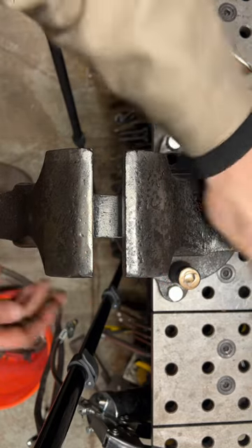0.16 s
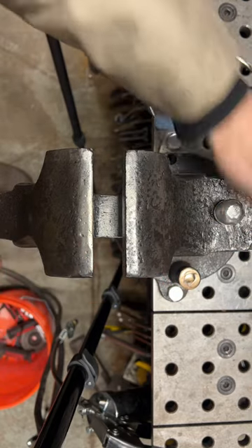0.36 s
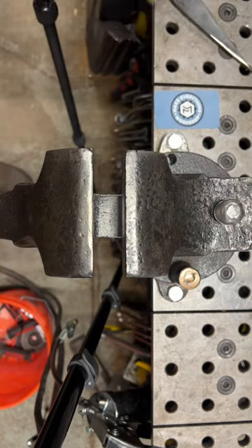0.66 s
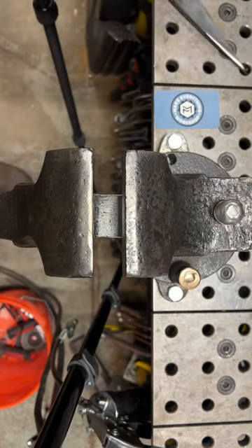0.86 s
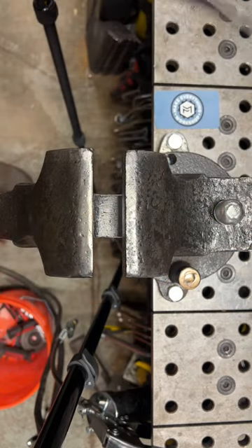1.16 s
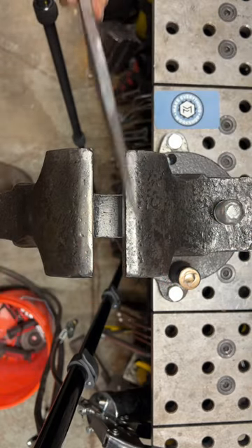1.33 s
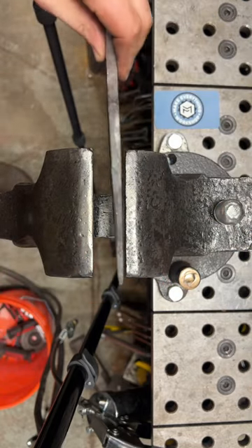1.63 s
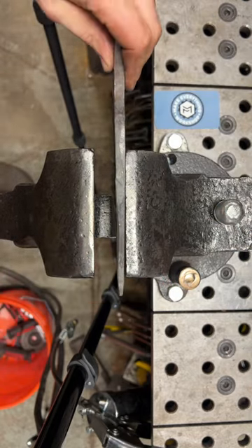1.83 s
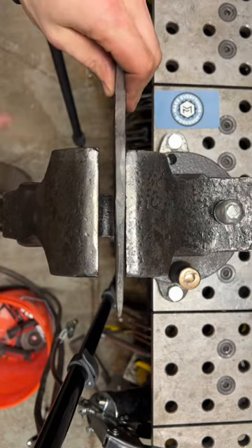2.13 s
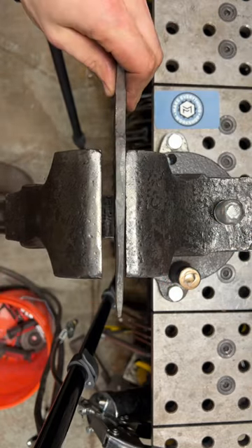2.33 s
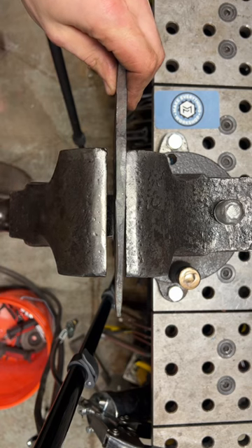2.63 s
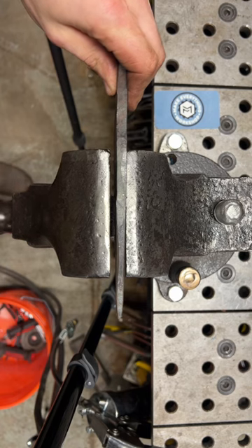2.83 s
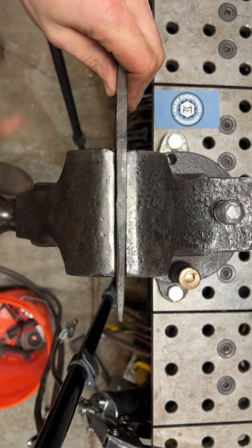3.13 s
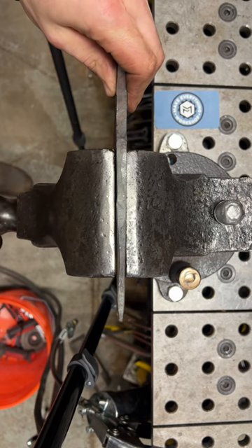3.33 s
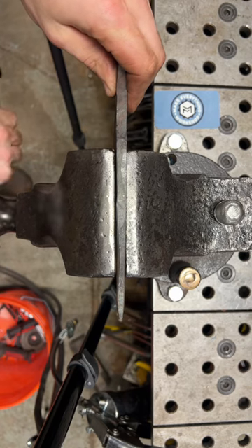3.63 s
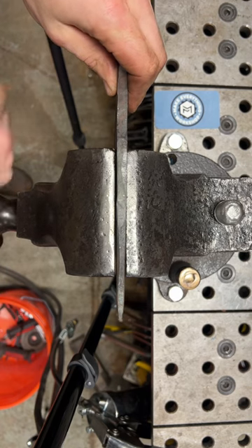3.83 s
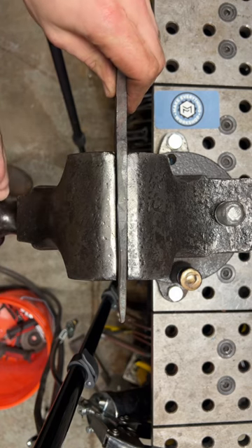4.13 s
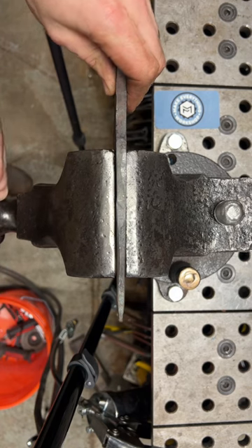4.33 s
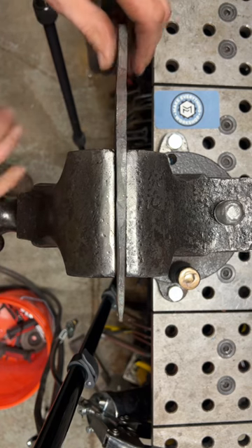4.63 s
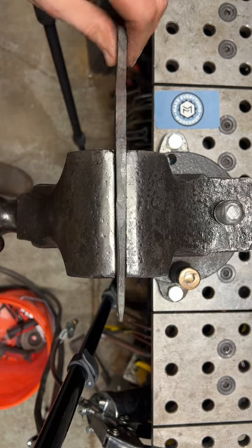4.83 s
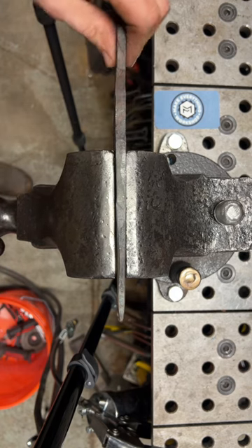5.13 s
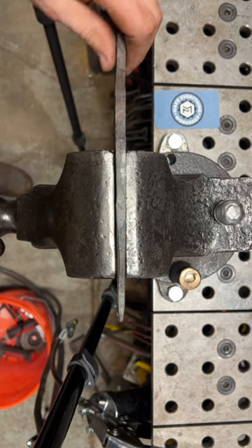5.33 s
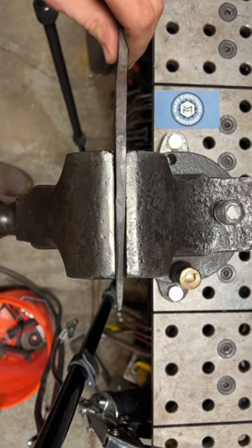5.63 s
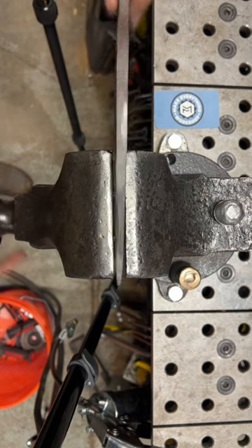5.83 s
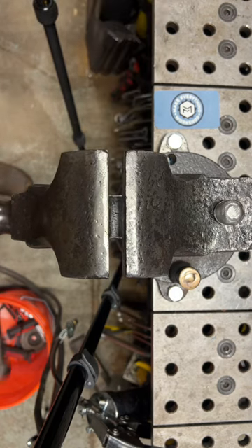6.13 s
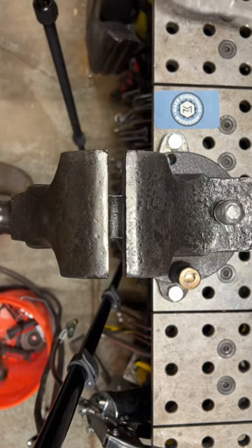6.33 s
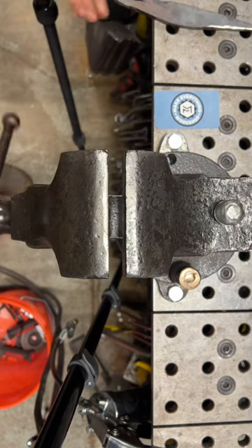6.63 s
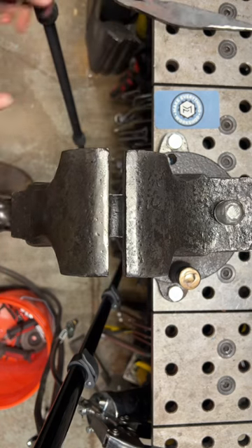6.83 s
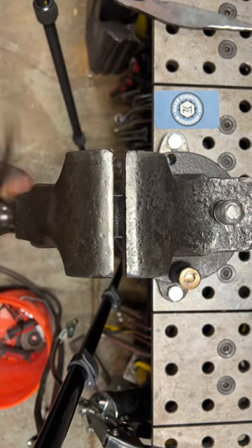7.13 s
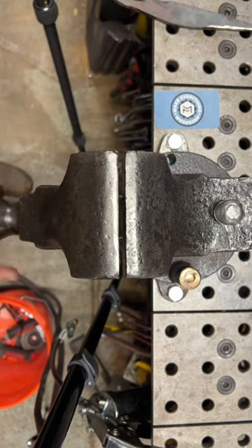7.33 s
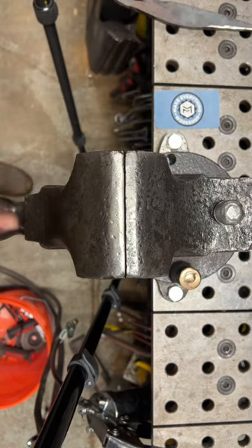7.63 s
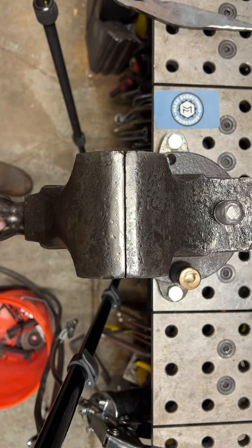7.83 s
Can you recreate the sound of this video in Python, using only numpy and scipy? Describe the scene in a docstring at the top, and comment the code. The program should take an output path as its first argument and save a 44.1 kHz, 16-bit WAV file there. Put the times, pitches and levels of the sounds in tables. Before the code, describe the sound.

A close stereo pickup in a workshop with short, faint echoes, over low stand rumble and quiet, swelling hiss. Tiny knocks at 0.1 s, then a soft gritty scrape of steel on the table around 0.8-0.9 s. A bright, thin tick rings at 1.56 s. Light clicks from 1.9 to 2.9 s lead to a strong dull clunk with a crack at 3.1 s. Uneven smaller knocks and rattles follow, with low jolts near 3.9 and 4.3 s, then a sharp triple clank around 4.45 s. A near-quiet gap ends with a thumping clunk at 5.42 s and the loud ringing clank at 5.5 s. High clinks at 6.2-6.3 s precede the blade's loud, bright clatter at 6.36-6.43 s, sliding out until 6.7 s. From 6.9 s quick hollow clacks gather, with a hard clink at 7.55 s, fading into small ticks by 7.9 s.

```python
"""A cast-iron bench vise is worked on a steel blade: slack in the screw knocks the casting into ringing modes.
The loose handle bar clinks, each time a bright crack and a ring; small loose parts rattle on the casting.
The blade is slid over the steel table in dense ticks and dropped, ringing its own modes; jolts thump the stand.
The stand rumbles under the work, as low noise that follows hands and knocks; quiet hiss swells and sinks.
The near metal has workshop echoes and is heard through two microphone ports."""
import sys
import numpy as np
from scipy import signal
from scipy.fft import rfft, irfft, next_fast_len
from scipy.io import wavfile
from scipy.ndimage import uniform_filter1d

SR = 44100
rng = np.random.default_rng(int(sys.argv[2]) if len(sys.argv) > 2 else 0)


def dump_mix(stems):
    """Bounce the given channels to the path in sys.argv[1] as a 16-bit WAV at rate SR."""
    frames = np.atleast_2d(stems).T  # one column per channel
    limited = np.clip(frames, -1, 1)  # hard clip at full scale
    pcm = np.round(limited * 32767).astype(np.int16)
    wavfile.write(sys.argv[1], SR, pcm)


N = 351036  # length in samples

# dull knocks in the casting: start_s, peak_db, centre_hz (of the blow), ring_factor (limited in use)
KNOCKS = [(0.112, -46.5, 660, .86), (0.148, -42.5, 1090, 1.24), (.817, -41, 840, 9.9),
          (1.714, -40.5, 630, 0.7), (1.92, -27.5, 585, 0.87), (2.096, -45.5, 636, 1.1),
          (2.137, -32.5, 653, 0.75), (2.234, -36, 593, 1.5), (2.277, -30.5, 922, 1),
          (2.592, -38.5, 840, .58), (2.782, -31, 815, 2.5), (2.83, -25, 662, 0.74), (2.858, -17, 910, 0.55),
          (3.087, -28.5, 880, 2.3), (3.114, -6.5, 866, 1.95), (3.15, -19, 814, 2.1), (3.34, -31, 1170, 1.6),
          (3.367, -26, 1380, 0.45), (3.402, -36, 690, 1.2), (3.491, -36, 1350, 1.6),
          (3.602, -39.5, 600, 1.2), (3.633, -20.5, 1007, .8), (3.721, -32.5, 987, 0.87),
          (3.759, -33.5, 531, 0.52), (3.862, -21.5, 954, .57), (3.931, -25.5, 1054, 1.3),
          (4.298, -38.5, 400, 3.0), (4.316, -21.5, 895, 1.2), (4.44, -18, 1090, 3.5),
          (4.463, -14.5, 1014, 1.1), (4.485, -14.5, 1920, 1), (4.896, -40, 1000, 1.3),
          (4.995, -36, 1010, 1.9), (5.422, -21.5, 388, 2.5), (5.428, -11.5, 830, 1.1),
          (5.449, -18.5, 1400, 0.53), (5.503, -3, 1026, 1.23), (5.614, -13, 1300, 0.52),
          (5.883, -40, 590, 1.7), (5.961, -26.5, 1400, 0.44), (6.281, -26.5, 2275, 1.0),
          (6.309, -25, 2320, 0.67), (6.456, -28.5, 612, 0.3), (6.532, -32.5, 597, 1.1),
          (6.72, -29.5, 1042, 0.87), (6.743, -32, 1010, .41), (6.786, -41.5, 1490, 0.44),
          (6.863, -36.5, 590, .64), (6.933, -16.5, 777, 1), (6.974, -12, 1095, 0.79),
          (7.036, -40, 890, .96), (7.053, -26, 810, 2.4), (7.089, -29.5, 1500, .8), (7.131, -18, 616, .82),
          (7.16, -24.5, 536, 0.91), (7.249, -31, 700, .9), (7.281, -15.5, 780, 1.7),
          (7.299, -24.5, 603, 0.73), (7.343, -11, 774, 0.98), (7.442, -13, 928, 0.74),
          (7.471, -16, 746, 1.1), (7.515, -24, 800, .6), (7.553, -10.5, 940, 0.67),
          (7.581, -19.5, 1357, 0.59), (7.633, -32.5, 582, 0.5), (7.716, -23.5, 1196, 0.81),
          (7.746, -30, 1170, 1), (7.801, -32, 1157, 1.15), (7.859, -28.5, 1200, 0.85)]
# ringing modes of the casting, before each blow varies them: mode_hz, level_db, t60_s
CASTING = [(542, -7.5, 0.086), (608, -10.5, 0.085), (836.8, -5.5, 0.06), (899, 2, 0.023), (1056, 4, 0.028),
           (1175.4, -2, 0.042), (1306.5, -4, 0.071), (1442, -1, 0.067), (1631, -17, 0.026),
           (1858, 5, 0.014), (2044, 0, 0.041), (2380, 4.5, 0.021), (2583, -8, 0.065), (3070, -13, 0.092)]
# the hands load the stand: start_s, deep_db (deep rumble)
RUMBLE = [(0.04, -71), (.15, -51.5), (.42, -67), (1.2, -75), (1.86, -66), (2.42, -62), (2.64, -76),
          (2.88, -57.5), (3.17, -58.5), (3.79, -71.5), (3.9, -49), (4.01, -42.5), (4.21, -74.5),
          (4.39, -53.5), (4.86, -67), (5.38, -74), (5.43, -37.5), (5.52, -55), (6.21, -72.5), (6.63, -78),
          (7.14, -59), (7.65, -45.5), (7.96, -82)]


def gain_of(db):
    """Decibels to an amplitude factor."""
    return 10 ** (np.asarray(db) / 20)


def evened(x):
    """Scales to rms 1."""
    return x / np.sqrt(np.mean(x ** 2) + 1e-20)


def read_curve(points, hz):
    """Reads a (Hz, value) table along log frequency."""
    points_hz, value = np.transpose(points)
    return np.interp(np.log(hz + 1), np.log(points_hz + 1), value)


def add(mix, start_s, sound, peak_db):
    """Places a sound in the mix at its peak level."""
    part = mix[round(start_s * SR):][:len(sound)]
    part += gain_of(peak_db) * (sound / abs(sound).max())[:len(part)]


def ring(hz, db, t60, rise_s, split_hz):
    """Dying sines with a rounded start; each mode is a close pair, so the ring throbs."""
    t = np.arange(int(min(max(t60), 1) * SR * .75))[:, None] / SR
    apart_hz = split_hz * rng.uniform(0.28, 1.3, len(hz))
    phase = 2 * np.pi * rng.random((2, len(hz)))
    pair = np.sin(2 * np.pi * hz * t + phase[0])
    pair = pair + 0.84 * np.sin(2 * np.pi * (hz + apart_hz) * t + phase[1])
    dying = (pair * gain_of(db - 60 * t / t60)).sum(1)
    return dying * (1 - np.exp(-t[:, 0] / rise_s)) ** 2


def resonate(x, hz, width_hz):
    """A two-pole resonance of gain 1 at its centre."""
    return signal.lfilter(*signal.iirpeak(hz, hz / width_hz, SR), x)


def noise(field_db, size):
    """Noise whose level in dB is a function of frequency and time, built from random spectra."""
    hz = np.fft.rfftfreq(size, 1 / SR)[:, None]
    t = np.arange(4 * N // size + 5) * size / 4 / SR
    real, imaginary = rng.standard_normal((len(t), len(hz), 2)).T
    spectra = (real + 1j * imaginary) * gain_of(field_db(hz, t))
    return signal.istft(spectra, nperseg=size, noverlap=size * 3 // 4)[1][:N]


def shaking(t, level_db):
    """Level of the shaking that the knocks leave in stand and bench; their powers add up."""
    fall_db_per_s, share = 107.5, 0.65  # share: how the shaking's dB grows with the knock's dB
    start_s, peak_db = np.transpose(KNOCKS)[:2, :, None]
    since_s = np.maximum(t - start_s, 0)
    power = gain_of(2 * (share * peak_db - fall_db_per_s * since_s))
    power = power * np.minimum(since_s / 0.0067, 1)  # builds up over 6.7 ms
    return gain_of(level_db) * np.sqrt(power.sum(0))


def upper_rumble():
    """Level of the upper rumble: part follows the hands, part the knocks."""
    start_s, deep_db = np.transpose(RUMBLE)
    t = np.arange(0, N / SR, .005)
    hands = gain_of(0.76 * (np.interp(t, start_s, deep_db) + 56.5) - 59)
    return np.interp(np.arange(N) / SR, t, hands + shaking(t, level_db=-36.5))


def rumble():
    """Lumpy low noise, split at 90 Hz: the deep part alike at both ports, the upper part almost alike."""
    # relative spectrum of the shaken stand: band_hz, density_db (per Hz)
    stand_curve = [(12, -50), (20, -25.5), (53, 6), (108, 3.5), (141, -2.5), (203, 0.5), (308, -11.5),
                   (343, -6.5), (500, -10), (650, -21), (1100, -120)]
    start_s, deep_db = np.transpose(RUMBLE)
    deep = evened(noise(lambda hz, t: read_curve(stand_curve, hz) - 60 * (hz > 90), size=2048))
    upper = evened(noise(lambda hz, t: read_curve(stand_curve, hz) - 60 * (hz <= 90), size=1024))
    # the difference between the ports is tilted toward the treble
    apart = evened(noise(lambda hz, t: read_curve(stand_curve, hz) + 6.5 * np.log2(hz / 100 + .01), size=1024))
    upper = upper_rumble() * (upper + np.outer([1, -1], gain_of(-10.5) * apart))
    return gain_of(np.interp(np.arange(N) / SR, start_s, deep_db)) * deep + upper


def hiss():
    """Background hiss that swells and sinks; its low part swings less and also rises with the shaking."""
    # swells of the hiss, relative: start_s, level_db
    swell_points = [(0, -64.5), (.66, -67.5), (.73, -81.5), (.79, -66), (1.02, -70.5), (1.25, -62.5),
                    (1.43, -65.5), (1.561, -51), (1.7, -64), (1.88, -67), (2.2, -56.5), (2.33, -74.5),
                    (2.512, -56.5), (2.58, -66), (2.7, -54), (2.85, -67), (3.2, -56), (3.6, -62),
                    (3.95, -57.5), (4.1, -77), (4.28, -72), (4.7, -59), (5.048, -69.5), (5.14, -53),
                    (5.39, -60), (5.58, -40), (6.03, -75.5), (6.168, -69.5), (6.36, -45.5), (6.801, -63),
                    (6.92, -57.5), (7.251, -60.5), (7.4, -52.5), (7.85, -70.5)]
    # relative spectrum common to both ports: band_hz, density_db (per Hz)
    mid_curve = [(88, -35), (150, -11), (250, -4), (304, -13.5), (549, -0.5), (630, 3), (682, -9),
                 (1280, -3), (2870, -7), (5070, -13.5), (7220, -11), (11400, -21.5), (16500, -71)]
    # relative spectrum of the difference between the ports: band_hz, density_db (per Hz)
    side_curve = [(88, -44), (150, -14), (281, -15), (434, 0), (3040, -7), (5380, -12), (7220, -46.5),
                  (8130, -20.5), (11600, -9), (15600, -13.5), (16500, -40)]
    start_s, level_db = np.transpose(swell_points)

    def swell(hz, t):
        """Fades from the low part's level to the high part's over 0.68 octave above 1200 Hz."""
        share = np.clip(np.log2(hz / 1200 + 1e-9) / 0.68, 0, 1)
        high_db = np.interp(t, start_s, level_db)
        low = gain_of(0.95 * (high_db + 66) - 62.5) + shaking(t, level_db=-38.5)
        return (1 - share) * 20 * np.log10(low) + share * high_db

    mid = noise(lambda hz, t: read_curve(mid_curve, hz) + swell(hz, t), size=512)
    side = noise(lambda hz, t: read_curve(side_curve, hz) + swell(hz, t), size=512)
    return gain_of(-11.5) * (mid + np.outer([1, -1], gain_of(-4.5) * side))


def rattle():
    """Small loose parts tap every second casting mode at random, harder while the stand shakes."""
    out = np.zeros(N)
    force = gain_of(15.5) * upper_rumble()
    for hz, db, t60 in CASTING[::2]:
        taps, at = np.zeros(N), rng.integers(0, N, size=100)
        taps[at] = gain_of(4.0 * np.minimum(rng.exponential(1, len(at)), 3))
        narrow = resonate(taps * force, hz, 5.5 / t60)
        out += gain_of(db) * resonate(narrow, hz, .4 * hz)
    return out


def knocks():
    """Each blow rings the casting modes near its centre over a rough scuff; some blows die away sooner."""
    near_db_per_oct, upper_db_per_oct = 19, 11.5  # modes fade away from the centre of the blow
    upper_db, soft_dulls = 3, 0.15  # soft_dulls: dB lost from the upper modes per dB of a weaker blow
    out = np.zeros(N)
    hz, db, t60 = np.transpose(CASTING)
    upper = hz > 1600
    t = np.arange(3000) / SR
    for start_s, peak_db, centre_hz, ring_factor in KNOCKS:
        spot_db = 2.2 * rng.standard_normal(len(hz))
        away_db = np.where(upper, upper_db_per_oct, near_db_per_oct) * abs(np.log2(hz / centre_hz))
        level_db = db + spot_db - away_db + upper * (upper_db + soft_dulls * peak_db)
        detuned_hz = hz * (1 + 0.012 * rng.standard_normal(len(hz)))  # a little, at random, for each blow
        modes = ring(detuned_hz, level_db, t60 * np.clip(ring_factor, .3, 4), rise_s=0.0011, split_hz=25)
        add(out, start_s, modes, peak_db)
        scuff = rng.standard_normal(len(t))
        for _ in range(2):
            scuff = resonate(scuff, centre_hz, 1.1 * centre_hz)
        scuff = scuff * np.exp(-t / .009) * (1 - np.exp(-t / 0.0074))
        add(out, start_s, scuff, peak_db - 13.5)
    return out


def crack(centre_hz):
    """A few milliseconds of bright noise from two hard faces meeting, and a short ring of the struck spot."""
    burst = rng.standard_normal(3000) * np.exp(-np.arange(3000) / SR / 0.0041)
    spot = 5.8 * resonate(burst, centre_hz, 70)
    fizz = 1.31 * resonate(burst, 18000, 15000)
    return resonate(burst, centre_hz, 0.55 * centre_hz) + fizz + spot


def clinks():
    """A crack, then the handle bar rings, each time raised in pitch by a small random amount."""
    # hard metal contacts: start_s, crack_db (peak), crack_hz (centre), ring_db (before any lift),
    # lower_db (modes below 6400 Hz), ring_factor (limited in use)
    contacts = [(0.1138, -30, 3580, -64, .5, .7), (0.13, -23, 5970, -67, -5, .7),
                (1.5642, -10.5, 7570, -14, -8, 0.087), (1.6255, -25, 3840, -85, 3, .43),
                (1.6474, -29, 3780, -76, 1, .7), (1.9185, -20.5, 4500, -50.5, 13, 0.52),
                (2.15, -20, 7050, -57, 10.5, .7), (2.8613, -17.5, 6946, -36.5, 9, 0.14),
                (3.1114, -13, 4130, -50, 7, .45), (3.1333, -18, 4030, -44, 10, 0.51),
                (3.364, -32, 3040, -67, 1.5, .93), (3.636, -31, 4500, -50.5, 16.5, 0.17),
                (3.7258, -22, 6930, -56, 1.5, .57), (3.8562, -34.5, 9100, -76.5, 6.5, .7),
                (3.934, -22, 3047, -48, -4.5, 0.41), (4.3077, -38.5, 3160, -56, -10.5, 0.97),
                (4.438, -16, 4300, -33, 14.5, 0.8), (4.4606, -0.5, 4340, -21.5, 1.5, 0.13),
                (4.4837, -9.5, 7140, -49, -12, .56), (5.4216, -21.5, 3170, -44, 4.5, 1.0),
                (5.4914, 1.5, 4310, -3, 2.5, 0.58), (5.776, -30, 4530, -56, -4, 0.77),
                (5.9646, -34.5, 7140, -47, 10, 0.2), (6.2072, -22, 7300, -12, -12, 0.25),
                (6.2826, -14, 7100, -5.5, -8.5, 0.41), (6.307, -5.5, 7080, -16, -2, .35),
                (6.3249, -4, 6900, -40.5, -5.5, .35), (6.355, -5.5, 3830, -36, 1, .55),
                (6.3887, -13, 3630, -35.5, -5, .7), (6.411, -2, 8700, -27.5, -10, 0.51),
                (6.9367, -10, 7020, -26, 8, 0.11), (6.975, -9.5, 5680, -48, 7, .59),
                (7.1282, -31.5, 3140, -56, 8, 0.63), (7.342, -8.5, 4740, -40.5, 12, 0.5),
                (7.44, -24, 3160, -58, 18.5, 1), (7.5487, 0, 6960, -11.5, -26, 0.26)]
    # ringing modes of the handle bar, before each contact varies them: mode_hz, level_db, t60_s
    handle_modes = [(2200, -13.5, 0.47), (3130, -24.5, .25), (4273, -3, 0.3), (4420, -12.5, 0.41),
                    (4420, -18, 0.12), (5890, -25.5, 0.45), (6830, -17, 0.72), (7010, 8, 0.16),
                    (8030, -11.5, 0.55), (10200, -10, 0.84), (11200, -15.5, 0.15), (14100, -26.5, .06)]
    top_db, drift = 5, 0.0066  # top_db: modes above 7600 Hz; drift: largest rise in pitch, as a fraction
    cracks, rings = np.zeros(N), np.zeros(N)
    hz, db, t60 = np.transpose(handle_modes)
    for start_s, crack_db, centre_hz, ring_db, lower_db, ring_factor in contacts:
        add(cracks, start_s, crack(centre_hz), crack_db)
        spot_db = 2.0 * rng.standard_normal(len(hz)) + lower_db * (hz < 6400) + top_db * (hz > 7600)
        shifted_hz = hz * (1 + drift * rng.random())
        damped_t60 = t60 * np.clip(ring_factor, .15, 3)
        bar = ring(shifted_hz, db + spot_db, damped_t60, rise_s=0.00082, split_hz=55)
        add(rings, start_s, bar, ring_db + max(lower_db - 3.5, 0))
    return cracks, rings


def thumps():
    """Heavy jolts through the stand: a low swing that sags in pitch, with a dying burst of shaking."""
    # start_s, peak_db, pitch_hz (where the sag settles), t60_s
    jolts = [(0.124, -36, 67.3, 0.2), (0.15, -38.5, 50, 0.2), (3.126, -39, 141, 0.15),
             (3.866, -32.5, 190.6, 0.39), (4.3, -34.5, 273, 0.47), (4.358, -31, 104.4, 0.4),
             (5.42, -30.5, 304, 0.096), (5.424, -14.5, 238, 0.055), (7.148, -31.5, 124, 0.12)]
    out, t = np.zeros(N), np.arange(SR // 2) / SR
    for start_s, peak_db, hz, t60 in jolts:
        turns = hz * (t + 0.0067 * (1 - np.exp(-t / 0.0044)))
        shake = rng.standard_normal(len(t))
        for _ in range(2):
            shake = resonate(shake, 120, 260)
        swing = np.sin(2 * np.pi * turns) + .5 * evened(shake)
        add(out, start_s, swing * gain_of(-60 * t / t60) * (1 - np.exp(-t / 0.0014)), peak_db)
    return out


def blade():
    """Drops ring the blade; sliding sends dense uneven ticks into the table top and the blade."""
    # the blade lands on the table and rocks: start_s, peak_db, favoured_hz, ring_factor (limited in use)
    drops = [(0.815, -38, 3900, 0.96), (6.356, -2, 3780, 0.29), (6.3886, -2, 3780, 0.42),
             (6.4121, 6, 8400, 0.32), (6.4265, -1.5, 6760, 0.89)]
    # pitches of the blade's modes: mode_hz
    blade_hz = [2470, 3826, 4463, 4690, 5093, 5464, 5900, 6755, 8790, 9459, 9910, 12395, 13030]
    # the same modes in order: level_db, t60_s (before the ring factor)
    blade_modes = [(-12.5, 0.33), (-7, 0.09), (-10.5, 0.5), (-27.5, 0.3), (-34.5, 0.078), (-25.5, .2),
                   (-16.5, 0.1), (-6.5, 0.25), (6, 0.23), (-11, 0.78), (2.5, 0.34), (9, .3), (-2, .25)]
    # two slides of the blade over the table: start_s, level_db, ring_db (blade against table top)
    slides = [
        [(.768, -63, -16), (.776, -40, -30), (.795, -56.5, -11), (.82, -41, -15), (.85, -53, 8.5),
         (.89, -43.5, 1), (.915, -61, 2.5), (.95, -86.5, -8)],
        [(6.3, -47, 9), (6.36, -34, 7.5), (6.43, -40, -12), (6.63, -42.5, -14), (6.7, -55, -16.5)],
    ]
    # resonances of the table top: mode_hz, width_hz, level_db
    table_modes = [(485, 34, 0.5), (643.4, 25, 15.5), (734, 85, 9), (1086, 160, -9), (1620, 590, -5),
                   (1960, 160, -0.5), (2380, 40, -26), (4050, 310, -6.5), (5900, 420, -21)]
    rub_hz = 4000  # rubbing favours blade modes near here
    stutter_db, stutter_s = 4.5, 0.019  # the rub catches and lets go: rms depth, smoothing time
    out, hz = np.zeros(N), np.array(blade_hz)
    db, t60 = np.transpose(blade_modes)
    for start_s, peak_db, centre_hz, ring_factor in drops:
        level_db = db - 5.5 * abs(np.log2(hz / centre_hz))
        drop = ring(hz, level_db, t60 * np.clip(ring_factor, .2, 2), rise_s=0.00055, split_hz=22)
        add(out, start_s, drop, peak_db)
    for rows in slides:
        s, *columns = np.transpose(rows)
        t = np.arange(s[0], s[-1], 1 / SR)
        level_db, ring_db = (np.interp(t, s, column) for column in columns)
        size_db = 3.0 * np.minimum(rng.exponential(1, len(t)), 4)
        ticks = gain_of(size_db) * rng.choice([-1, 1], len(t)) * (rng.random(len(t)) < .06)
        stutter = uniform_filter1d(rng.standard_normal(len(t)), round(stutter_s * SR))
        ticks *= gain_of(stutter_db * evened(stutter))
        top = evened(sum(gain_of(d) * resonate(ticks, f, width) for f, width, d in table_modes))
        rub_db = 0.5 * db - 4.3 * abs(np.log2(hz / rub_hz))
        modes = sum(gain_of(d) * resonate(ticks, f, 50) for f, d in zip(hz, rub_db))
        rub = (top + evened(modes + 0.018 * ticks) * gain_of(ring_db)) * gain_of(level_db)
        out[round(s[0] * SR):][:len(t)] += rub * signal.windows.tukey(len(t), .04)
    return out


def shop(x, alike=0.88):
    """Sparse reflections of random sign, each band dying at its own speed, partly alike at both ports."""
    # decay of the workshop echoes: band_hz, t60_s
    echo_decay = [(300, 1), (1000, 0.6), (3000, 0.57), (6000, 0.51), (11000, 0.12)]
    taps = np.zeros((2, SR))
    slots = np.arange(260, SR - 20, 20)  # one reflection in each slot of 20 samples
    at = slots + rng.integers(0, 20, (2, len(slots)))
    np.put_along_axis(taps, at, rng.choice([-1., 1.], at.shape), 1)
    hz, t, spectra = signal.stft(taps, SR, nperseg=256)
    decay = gain_of(-60 * t / read_curve(echo_decay, hz)[:, None])
    common, apart = signal.istft(spectra * decay, SR, nperseg=256)[1]
    apart = np.sqrt(1 - np.clip(alike, 0, 1) ** 2) * apart
    tail = np.array([alike * common + apart, alike * common - apart]) / np.linalg.norm(common)
    return signal.fftconvolve(x[None], tail, axes=1)[:, :N]


def ports(x):
    """The microphone dulls the top; its two ports differ in level and phase with pitch."""
    # response of the microphone: band_hz, level_db
    response = [(1000, 0.94), (2500, -1), (7000, -3.5), (10000, -15), (13000, -5.5), (16000, -26.5)]
    # level between the ports: band_hz, lean_db (left minus right)
    lean = [(100, -5), (200, 1.5), (400, 3), (700, -3), (1400, -2.5), (2800, 0.6)]
    # phase between the ports: band_hz, lead_rad (left leads)
    lead = [(300, .1), (780, -.7), (1120, .3), (2500, -.7), (4500, -.8), (6500, -.3), (9000, -1),
            (10600, -2.2), (12700, -3.1)]
    size = next_fast_len(N + 4096)
    hz = np.fft.rfftfreq(size, 1 / SR)
    side = np.array([[.5], [-.5]])  # left and right take half the difference each
    level = gain_of(read_curve(response, hz) + side * read_curve(lean, hz))
    heard = level * np.exp(1j * side * read_curve(lead, hz))
    return irfft(rfft(x, size) * heard, size)[:, :N]


def scene():
    """Near metal with its echoes, over thumps, rumble and hiss."""
    dull = knocks() + rattle()
    cracks, rings = clinks()
    steel = blade()
    to_echo = gain_of(-16.5) * dull + gain_of(-13.5) * cracks + gain_of(-6.5) * rings + gain_of(-14.5) * steel
    metal = ports(dull + cracks + rings + steel + shop(to_echo))
    return metal + thumps() + rumble() + hiss()


def record(dry):
    """A soft ceiling squashes the loudest peaks; then a low-pass limits the band."""
    squashed = dry / (1 + (dry / .95) ** 6) ** (1 / 6)
    low_pass = signal.firwin(511, 16700, window=("kaiser", 9), fs=SR)  # edge in Hz
    return signal.oaconvolve(squashed, low_pass[None], "same")


dry = scene()
out = record(dry)
dump_mix(out)
```